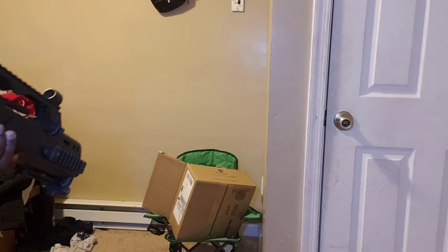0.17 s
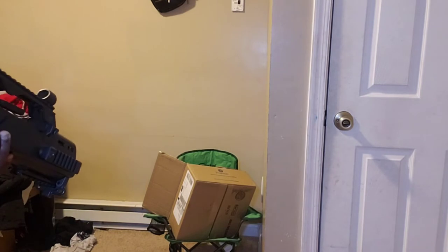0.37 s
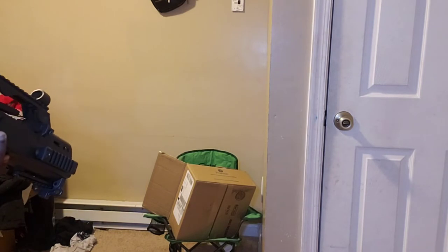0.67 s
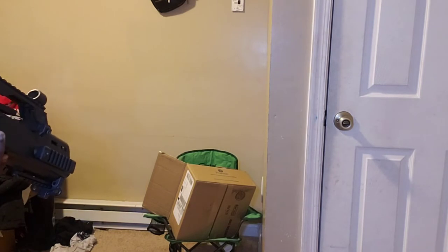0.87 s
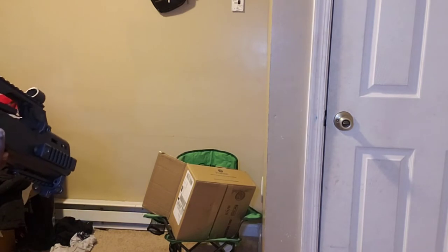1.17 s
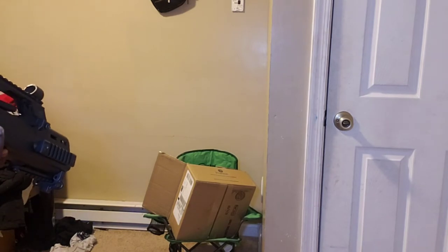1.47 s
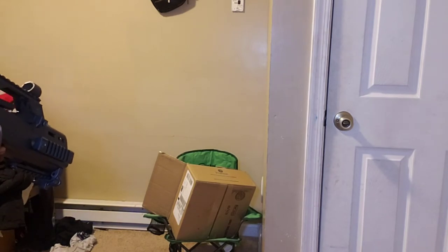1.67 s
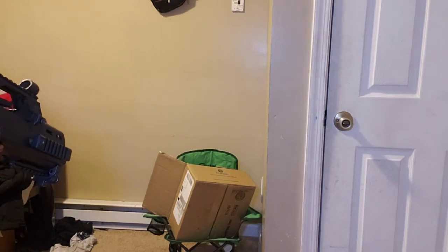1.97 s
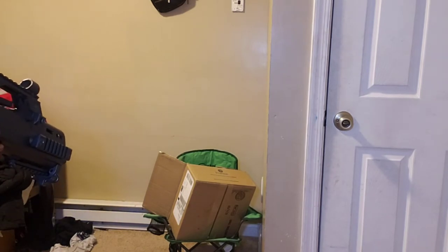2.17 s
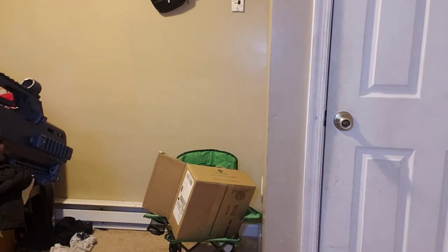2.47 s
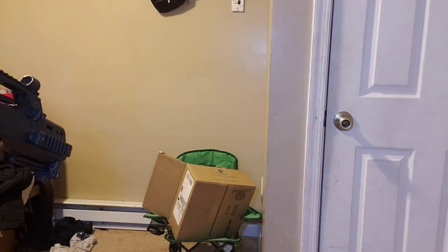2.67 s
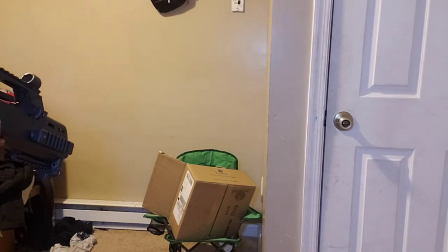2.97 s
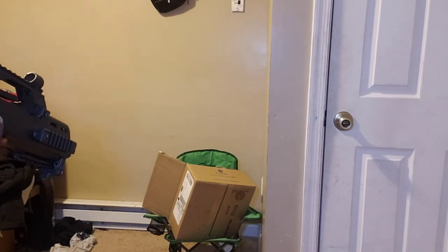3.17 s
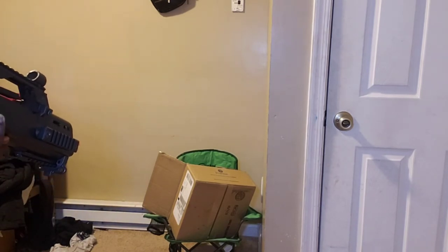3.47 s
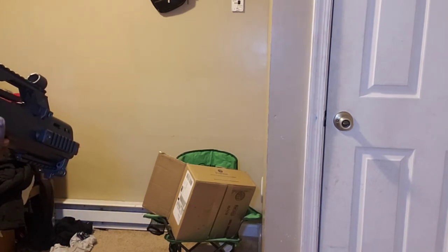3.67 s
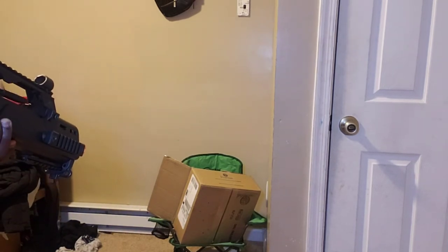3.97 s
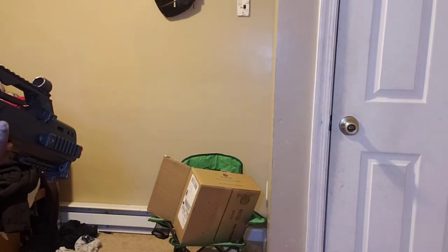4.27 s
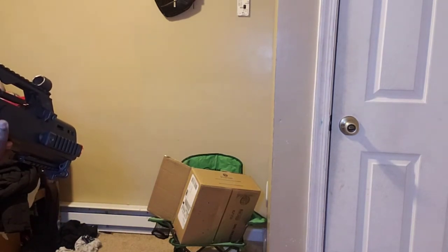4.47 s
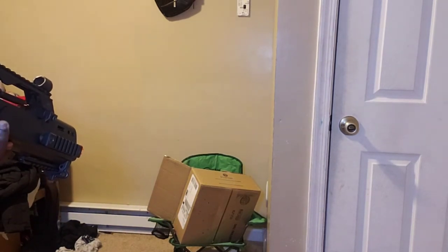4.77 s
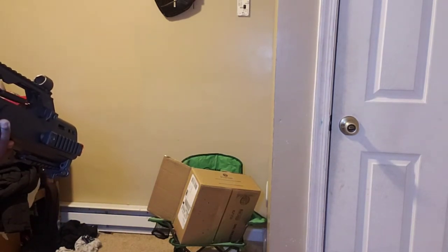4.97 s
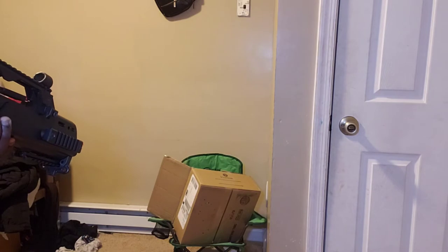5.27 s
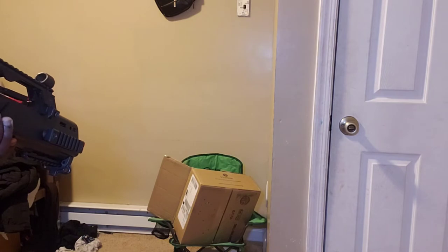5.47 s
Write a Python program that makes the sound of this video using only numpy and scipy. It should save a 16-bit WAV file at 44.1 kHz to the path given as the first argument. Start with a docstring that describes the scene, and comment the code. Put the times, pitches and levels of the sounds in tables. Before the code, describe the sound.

A small, quiet room with a faint electrical hum. In the first second there are light handling clicks, a few soft bumps on the microphone and a very faint whirr and squeak. Then an electric airsoft rifle, close by, fires thirteen single shots at a cardboard box. Three come at about 1.1, 1.4 and 1.7 seconds, two at 2.3 and 2.6, five evenly from 3.1 to 4.3, two at 4.8 and 5.1, and a last one at 5.6. Each begins with a tenth of a second of grinding gear whine, then a sharp, hissing pop of air with a plastic knock, almost merged with the pellet's smack on cardboard. A small latch clack follows. The shots are about equally loud and ring briefly off the bare walls. Faint trigger clicks fall between the strings, and the background drops lower from the first shot on.

```python
"""An electric airsoft rifle fires thirteen single shots at a cardboard box in a small bare room.
Each time the motor kicks in, gears wind the spring, the piston slides and slams out a pop of air,
the pellet smacks the box and the gears drop back on their latch. Around the shots are trigger clicks,
bumps on the camera, a faint whirr and squeak, mains hum and room air.
The camera's gain control ducks at the first shot and stays down."""
import sys
import numpy as np
from scipy import signal
from scipy.fft import rfft, irfft
from scipy.io import wavfile
from scipy.ndimage import uniform_filter1d

SR = 44100
rng = np.random.default_rng(int(sys.argv[2]) if len(sys.argv) > 2 else 0)


def wav_out(sig):
    """Save sig, one row per channel (or a flat mono array), as 16-bit PCM at SR to the path in sys.argv[1]."""
    wavfile.write(sys.argv[1], SR, np.round(np.clip(np.atleast_2d(sig).T, -1, 1) * 32767).astype(np.int16))


N = 247401

# one firing cycle a row, timed from its pop of air:
# pop t/s, wind-up before it/s, motor kick/dB, tooth rate/Hz, pellet flight/s, latch delay/s, latch/dB
SHOTS = [(1.0503, 0.098, -1.5, 1425, 0.018, 0.093, 5), (1.3934, 0.095, -1, 1416, .017, 0.11, 11),
         (1.6924, .094, -1, 1383, 0.019, 0.11, 11.5), (2.3125, 0.093, -6, 1387, 0.014, 0.12, 11.5),
         (2.5820, 0.092, 0.5, 1395, 0.015, 0.097, 8), (3.1185, 0.095, 0.5, 1353, 0.015, 0.11, 6.5),
         (3.4182, 0.099, -2.5, 1382, 0.016, 0.14, 9), (3.6958, .097, 9.5, 1384, .017, 0.13, -11),
         (3.9734, .098, 10, 1353, .016, 0.079, 2), (4.259, 0.094, 7, 1583, .016, 0.11, -1),
         (4.8167, 0.089, -1, 1376, .016, .127, 12), (5.0991, 0.097, 7.5, 1381, 0.02, 0.096, 9.5),
         (5.5649, .093, -6.5, 1383, .024, .106, 10)]


def muzzle(pop_db=30, ring_db=-13, puff_db=-1, puff_lead_s=.007):
    """The piston pushes out a low puff, then a hissing pop of air that sets gun and room ringing."""
    pop_spectrum = [(25, -49.5), (60, -37.5), (130, -19.5), (270, -16), (420, -6), (780, -2), (1200, -4),
                    (1800, -10), (4200, -12.5), (5700, -3.5), (6900, 3.5), (7800, -2), (9300, -13.5),
                    (16000, -28.5)]  # bright burst of air: f/Hz, level/dB
    puff_spectrum = [(25, -44.5), (90, -9.5), (150, -7), (270, 2), (420, -7), (800, -13.5), (2000, -33.5),
                     (8000, -58.5)]  # soft push of air: f/Hz, level/dB
    modes = [(160, -7, 0.25), (197, -3, 0.064), (244, 0.5, 0.17), (286.6, 1.5, 0.2), (344, -2.5, 0.049),
             (460.3, -0.5, 0.32), (648.3, 9.5, 0.21), (795, 7, 0.17), (798, 2.5, 0.22), (850, -21, 1),
             (1046, -0.5, 0.28), (1208, -1.5, 0.45), (1250, -2.5, 0.48), (1473, -0.5, 0.25)]  # resonances of gun and room: f/Hz, level/dB, t60/s
    # the same spring drives every shot, so the pop keeps its strength
    pop = blows([(s, pop_db) for s, *_ in SHOTS], rattle_db=-9, rattle_t60=0.047)
    puff = blows([(s - puff_lead_s, puff_db) for s, *_ in SHOTS], rattle_db=4.5, rattle_t60=0.078)
    t = seconds(.8)
    ring = sum(from_db(db - 60 * t / t60) * np.sin(2 * np.pi * (hz * t + rng.random()))
               for hz, db, t60 in modes)
    bloom = 1 - np.exp(-t / 0.0099)
    ringing = from_db(ring_db) * through(pop, unit(ring * bloom))
    return colour(pop, pop_spectrum), colour(puff, puff_spectrum), ringing


def pellets(hit_db=25.5, snap_hz=2900, snap_t60=0.0029, snap_db=-7):
    """Each pellet crosses the room and smacks the cardboard, whose skin gives a short bright snap."""
    cardboard = [(25, -51), (80, -24), (200, -14.5), (500, -4.5), (1150, 4.5), (1700, -1), (2400, -3),
                 (3000, -7), (3800, 2), (6000, -10), (9000, -10), (16000, -30)]  # smack on the box: f/Hz, level/dB
    hits = [(s + flight_s, hit_db) for s, _, _, _, flight_s, *_ in SHOTS]
    smack = colour(blows(hits, rattle_db=6.5, rattle_t60=0.016), cardboard)
    t = seconds(.03)
    snap = unit(np.sin(2 * np.pi * snap_hz * t) * from_db(-60 * t / snap_t60))
    for s, db in hits:
        add(smack, s, from_db(db + snap_db) * snap)
    return smack


def piston_slam(slam_db=19.5):
    """The piston slams on the cylinder head and knocks through the plastic shell."""
    shell = [(25, -53.5), (150, -18.5), (270, -10), (420, -18), (800, 4.5), (1100, -2), (1600, -10),
             (2200, 0.5), (2800, -11.5), (4500, -15), (6700, 0), (8000, -9), (10000, -27), (16000, -35)]  # knock of the shell: f/Hz, level/dB
    return colour(blows([(s, slam_db) for s, *_ in SHOTS], rattle_db=0, rattle_t60=0.016), shell)


def gears(run_up_s=.02, sag=0.083, wobble=.018, coast_s=0.0031, usual_tooth_hz=1385,
          mesh_db=-3, overtone_db=-11, grind=0.78):
    """The motor runs up, then slows against the spring; meshing teeth whine and grind."""
    grind_spectrum = [(100, -42.5), (380, -28), (500, -20), (650, 2.5), (950, -5), (1350, 3.5), (1900, -8),
                      (2500, -1), (3400, -10), (4800, -14.5), (6300, -9), (8000, -22.5), (11000, -28),
                      (16000, -48)]  # rubbing teeth: f/Hz, level/dB
    whines, rubs, t = np.zeros(N), np.zeros(N), seconds(.16)
    for pop_s, wind_s, _, tooth_hz, *_ in SHOTS:
        wound = np.minimum(t / wind_s, 1)
        speed = (1 - np.exp(-t / run_up_s * 2)) * (1 + sag / 2 - sag * wound)
        phase = 2 * np.pi * np.cumsum(tooth_hz * speed * (1 + wobble * drift(t, 300))) / SR
        whine = np.sin(phase) + from_db(overtone_db) * (np.sin(2 * phase) + 1.2 * np.sin(3 * phase))
        rub = rng.standard_normal(len(t)) * (1 + grind * np.cos(phase))
        load = (1 - np.exp(-t / run_up_s)) * np.exp(-np.maximum(t - wind_s, 0) / coast_s)
        db = -20 + 11 * np.log2(tooth_hz / usual_tooth_hz)  # a faster motor is louder
        force = from_db(db + 2.1 * drift(t, 350)) * load  # uneven teeth
        add(whines, pop_s - wind_s, force * whine)
        add(rubs, pop_s - wind_s, force * rub)
    return 1.03 * colour(rubs, grind_spectrum) + from_db(mesh_db) * whines


def gearbox_knocks(slide_s=.012, release_db=11, cushion_hz=3500):
    """The motor's first kick, cushioned by gear slack, and the piston's release just before the pop."""
    knock_spectrum = [(150, -30), (430, -28.5), (650, 0.5), (950, -3), (1600, -10), (2400, -6),
                      (3400, -14.5), (6500, -14), (10000, -33.5), (16000, -51.5)]  # gearbox body: f/Hz, level/dB
    kicks = blows([(s - wind_s, db) for s, wind_s, db, *_ in SHOTS], rattle_db=9, rattle_t60=0.018)
    kicks = signal.sosfilt(signal.butter(2, cushion_hz, fs=SR, output="sos"), kicks + 1e-18)
    releases = blows([(s - slide_s, release_db) for s, *_ in SHOTS], rattle_db=7.5, rattle_t60=0.036)
    return colour(kicks + releases, knock_spectrum)


def latch(rebound_s=0.015, rebound_db=-7):
    """After each shot the gears drop back on their latch and rebound once."""
    pawl = [(150, -35), (480, -19), (660, 1), (900, -3), (1400, -9.5), (2500, -16.5), (4500, -31.5),
            (7000, -24), (14000, -48)]  # clack of the latch: f/Hz, level/dB
    drops = [(s + delay_s, db) for s, *_, delay_s, db in SHOTS]
    rebounds = [(s + rebound_s, db + rebound_db) for s, db in drops]
    return colour(blows(drops + rebounds, rattle_db=-5, rattle_t60=0.02), pawl)


def trigger():
    """Trigger and grip give small rattly clicks."""
    clicks = [(0.012, -5.5, 0.024), (0.204, -27.5, 0.17), (0.918, -13, 0.052), (2.16, -18.5, 0.16),
              (2.979, -14, 0.033), (4.640, -17.5, 0.06)]  # handling clicks: t/s, level/dB, rattle t60/s
    click_spectrum = [(150, -37.5), (450, -16), (1000, 2.5), (2200, -3.5), (3200, -4.5), (6000, -9.5),
                      (9000, -17), (15000, -50.5)]  # tone of a click: f/Hz, level/dB
    rattles = sum(blows([(s, db)], rattle_db=14, rattle_t60=t60) for s, db, t60 in clicks)
    return colour(rattles, click_spectrum)


def room(x, build_s, hold_s, direct_db, echo_db, scatter_s=0.001, sway_rad_per_s=1.091):
    """Direct sound, three reflections smeared by clutter, and a tail that changes as the gun sways."""
    echoes = [(.0048, 1.5), (.0066, -3.5), (.0103, 2.5)]  # off floor, wall and door: delay/s, level/dB
    early, t = np.zeros(len(seconds(.03))), seconds(.008)
    early[0] = from_db(direct_db)
    for delay, db in echoes:
        smear = unit(rng.standard_normal(len(t)) * np.exp(-t / scatter_s))
        add(early, delay, from_db(echo_db + db) * smear)
    sway = sway_rad_per_s * np.arange(N) / SR
    tails = sum(through(x * share, reverberation(build_s, hold_s))
                for share in (np.cos(sway), np.sin(sway)))
    return (through(x, early) + tails) / np.sqrt(1 + np.sum(early ** 2))


def reverberation(build_s, hold_s, size=32768):
    """Diffuse tail: reflections thicken, hold while sound crosses the room, then die band by band."""
    decay_times = [(100, 0.12), (260, 0.22), (700, 0.33), (1840, 0.35), (4850, 0.35), (7000, 0.34),
                   (12800, 0.24)]  # the bare room's decay: f/Hz, t60/s
    t, hz = np.arange(size) / SR, np.fft.rfftfreq(size, 1 / SR)
    white = rfft(rng.standard_normal(size))
    edges = np.r_[0, np.geomspace(100, 16000, 19), SR]
    swell = 1 - np.exp(-(t / build_s) ** 2)
    fall = np.log(1000) * np.maximum(t - hold_s, 0)
    tail = 0
    for low, high in zip(edges, edges[1:]):
        band = (hz >= low) & (hz < high)
        decay = np.exp(-fall / at_hz(decay_times, (low + high) / 2))
        tail += unit(irfft(white * band) * swell * decay) * np.sqrt(band.mean())
    return tail


def camera_bumps():
    """Small knocks thud through the camera body before the first shot."""
    bumps = [(0.243, -29), (0.285, -32), (0.348, -25), (0.408, -17), (0.416, -18.5)]  # knocks: t/s, level/dB
    thud = [(40, -12), (130, 1), (280, 0.5), (600, -7), (1000, -24), (1500, -18), (3000, -30.5),
            (8000, -37), (15000, -52)]  # camera body: f/Hz, level/dB
    return colour(blows(bumps, rattle_db=-4, rattle_t60=0.013), thud)


def whirr_and_squeak():
    """A faint whirr swells twice; a thin squeak comes and goes with it."""
    whirrs = [(0.2, 0.24, -59), (0.78, 0.071, -66.5)]  # swells of the whirr: t/s, length/s, level/dB
    whirr_tones = [(333, -0.5), (395, -12.5), (1460, -20), (1720, -17), (4000, -27.5)]  # its partials: f/Hz, level/dB
    squeaks = [(0.2, 0.09, -76), (0.48, 0.06, -72.5), (0.78, 0.047, -77.5), (0.9, 0.05, -71)]  # swells of the squeak: t/s, length/s, level/dB
    squeak_tones = [(2780, 0.5), (2950, -8.5)]  # its partials: f/Hz, level/dB
    return wavering(whirrs, whirr_tones) + wavering(squeaks, squeak_tones)


def wavering(swells, tones, rise_db_per_s=270, fade_db_per_s=148.5,
             flutter=0.013, wander=.008, flicker_db=3.5):
    """Unsteady tones that swell, hold and fade."""
    t, chord = np.arange(N) / SR, 0
    envelope = sum(from_db(db - rise_db_per_s * np.maximum(s - t, 0)
                           - fade_db_per_s * np.maximum(t - s - length, 0)) for s, length, db in swells)
    for hz, db in tones:
        pitch = hz * (1 + flutter * drift(t, 120) + wander * drift(t, 9.3))
        chord += from_db(db + flicker_db * drift(t, 25)) * np.sin(2 * np.pi * np.cumsum(pitch) / SR)
    return envelope * chord


def room_tone(air_db=-69, hum_db=-61.2, mains_hz=59.8):
    """A steady bed of room air and mains hum."""
    air_spectrum = [(20, -14.5), (35, -6), (120, 3.5), (250, -4.5), (400, -5), (600, -13.5), (1500, -14),
                    (2200, -21), (2750, -15), (3400, -21.5), (8000, -28.5), (16000, -44)]  # dull hush: f/Hz, level/dB
    air = from_db(air_db) * colour(rng.standard_normal(N), air_spectrum)
    hum = from_db(hum_db) * np.sqrt(2) * np.sin(2 * np.pi * mains_hz * np.arange(N) / SR)
    return air + hum


def blows(hits, rattle_db, rattle_t60):
    """Each hit (t/s, level/dB) is a clean impulse and a short rattle that is new every time."""
    track, t = np.zeros(N), seconds(.1)
    for s, db in hits:
        blow = from_db(rattle_db) * unit(rng.standard_normal(len(t)) * from_db(-60 * t / rattle_t60))
        blow[0] += 1
        add(track, s, from_db(db) * unit(blow))
    return track


def colour(x, spectrum, size=4096):
    """Minimum-phase filter of unit energy: the spectrum sets only the tone."""
    gains = from_db(at_hz(spectrum, np.arange(size // 2 + 1) * SR / size))
    cepstrum = irfft(np.log(gains))
    cepstrum[1:size // 2] *= 2
    cepstrum[size // 2 + 1:] = 0
    return through(x, unit(irfft(np.exp(rfft(cepstrum)))))


def from_db(db):
    """Decibels to gain."""
    return 10 ** (np.asarray(db) / 20)


def unit(x):
    """Scale to an energy of one."""
    return x / np.sqrt(np.sum(x ** 2) + 1e-20)


def seconds(length):
    """A time axis."""
    return np.arange(int(length * SR)) / SR


def at_hz(points, hz):
    """Read a table on a log-frequency axis."""
    f, value = np.transpose(points)
    return np.interp(np.log(np.maximum(hz, 1)), np.log(f), value)


def through(x, response):
    """Convolve and keep the length."""
    return signal.oaconvolve(x, response)[:len(x)]


def add(track, s, sound):
    """Mix a sound into a track at a time."""
    i = int(np.clip(round(s * SR), 0, N - 1))
    track[i:i + len(sound)] += sound[:N - i]


def drift(t, rate):
    """A random glide with a spread of about one."""
    return np.interp(t * rate, np.arange(4096), rng.standard_normal(4096))


def scene():
    """The muzzle points away, so its pop arrives mostly off the walls; the gun itself is close by."""
    pop, puff, ringing = muzzle()
    clicks = trigger()
    shots = room(pop, build_s=0.0062, hold_s=0.038, direct_db=-21, echo_db=-10) + ringing
    box = room(pellets(), build_s=0.005, hold_s=0.023, direct_db=-4.5, echo_db=-11.5)
    action = gears() + gearbox_knocks() + piston_slam() + clicks + puff
    gun = room(action, build_s=0.0098, hold_s=0.013, direct_db=1.5, echo_db=-18)
    clacks = room(latch(), build_s=0.007, hold_s=0.008, direct_db=3.5, echo_db=-11.5)
    background = room_tone() + camera_bumps() + whirr_and_squeak()
    return (shots + box + gun + clacks + background)[None]


def gain_control(x, limit_db=-10, window_s=0.0055):
    """Ducks at once when the level passes the limit and stays down."""
    power = uniform_filter1d(x[0] ** 2, int(window_s * SR))
    over_db = np.maximum(10 * np.log10(np.maximum(power, 1e-12)) - limit_db, 0)
    return x * from_db(-np.maximum.accumulate(over_db))


def record(dry, ceiling=.66, low_cut_hz=45, high_cut_hz=16050):
    """The camera's gain control, rounded peaks, a low cut and a steep cut at the top."""
    ducked = gain_control(dry)
    rounded = ducked / (1 + (ducked / ceiling) ** 6) ** (1 / 6)
    lean = signal.sosfilt(signal.butter(2, low_cut_hz, "high", fs=SR, output="sos"), rounded)
    return signal.sosfilt(signal.ellip(12, .1, 80, high_cut_hz, fs=SR, output="sos"), lean)


dry = scene()
out = record(dry)
wav_out(out)
```